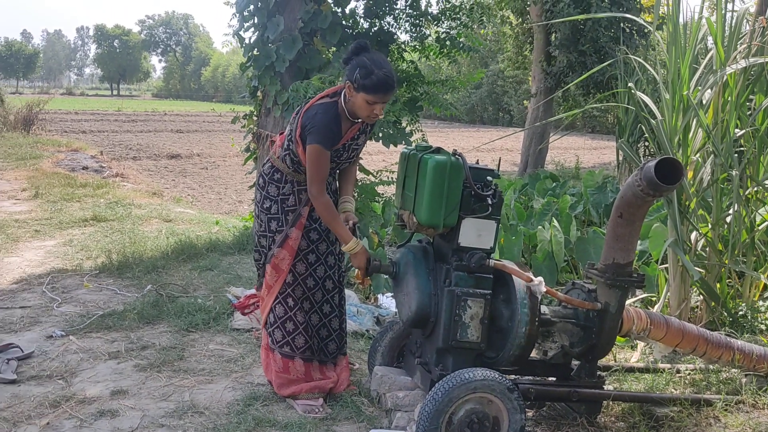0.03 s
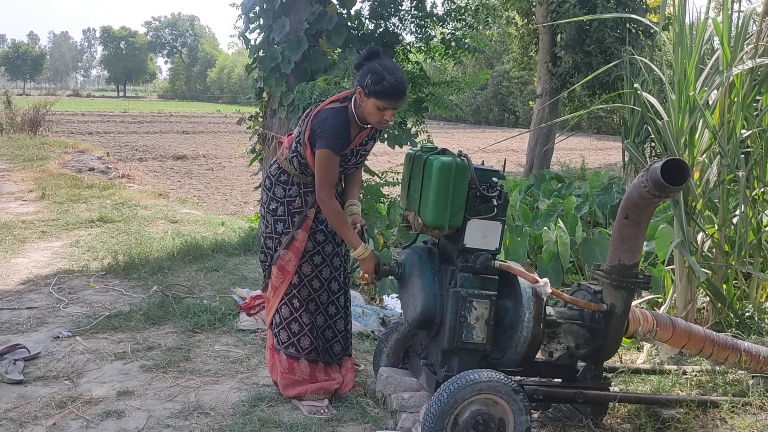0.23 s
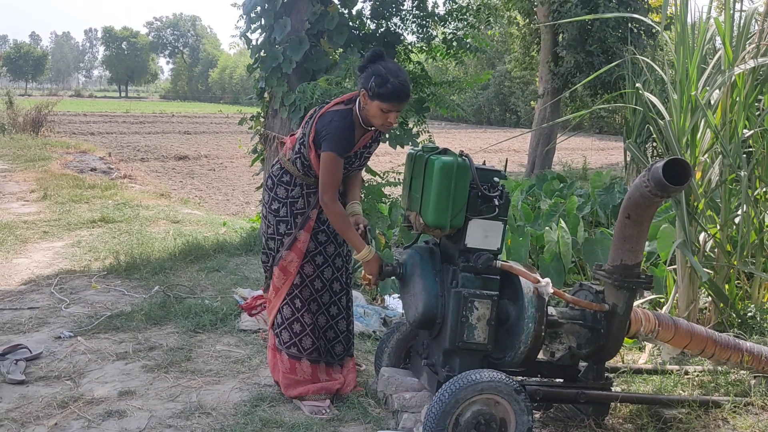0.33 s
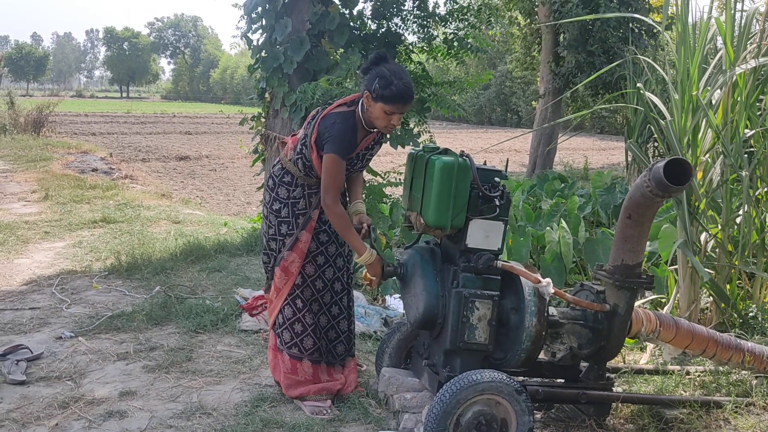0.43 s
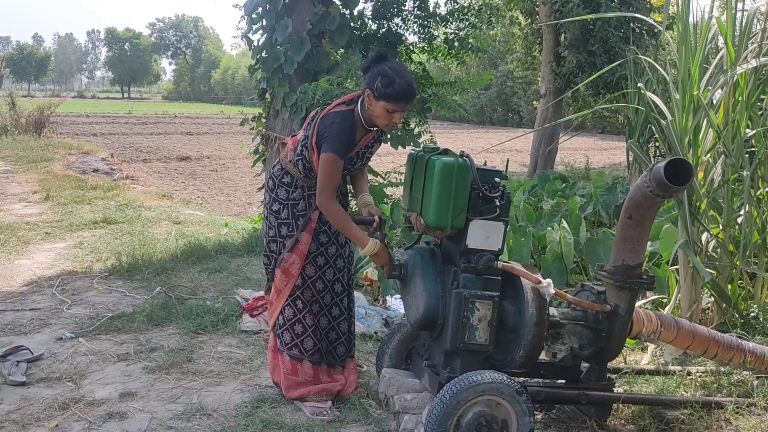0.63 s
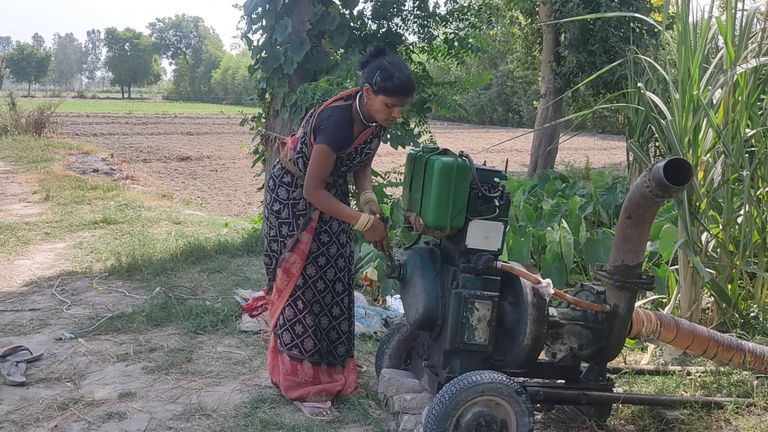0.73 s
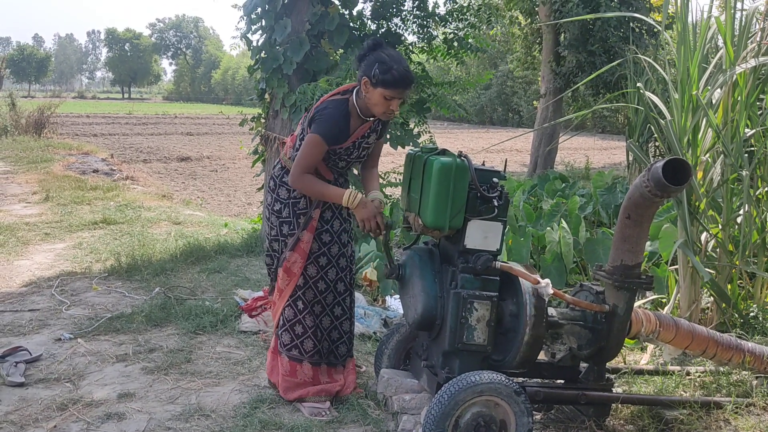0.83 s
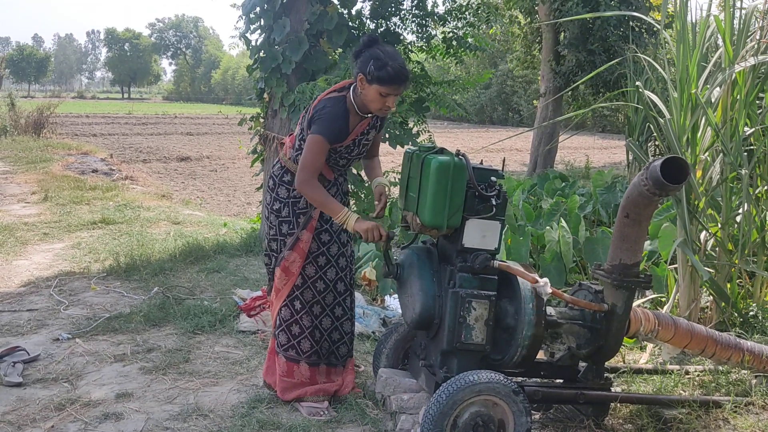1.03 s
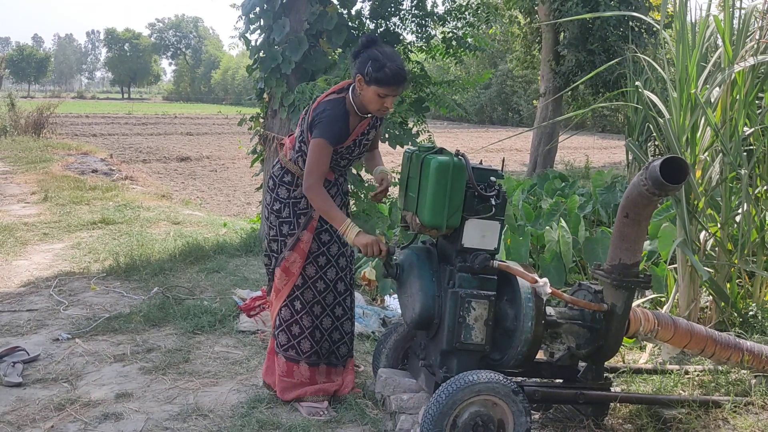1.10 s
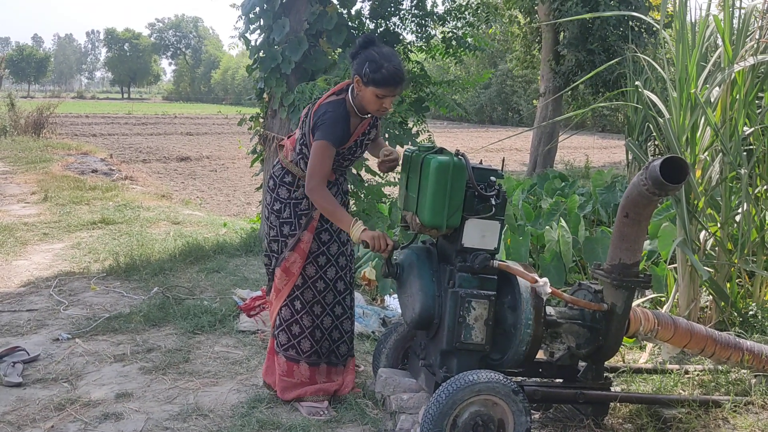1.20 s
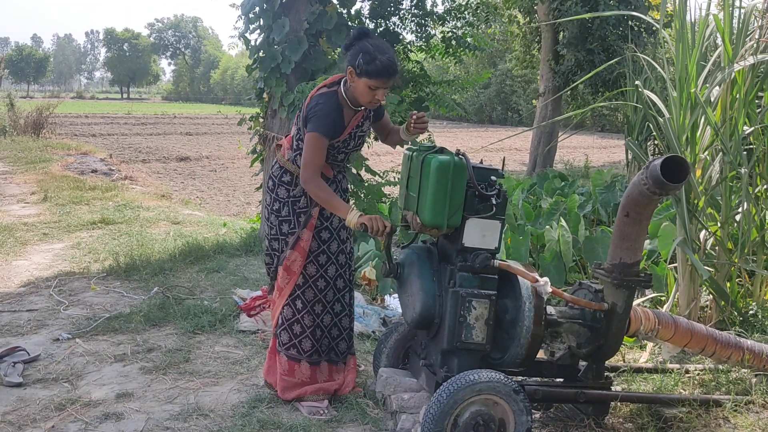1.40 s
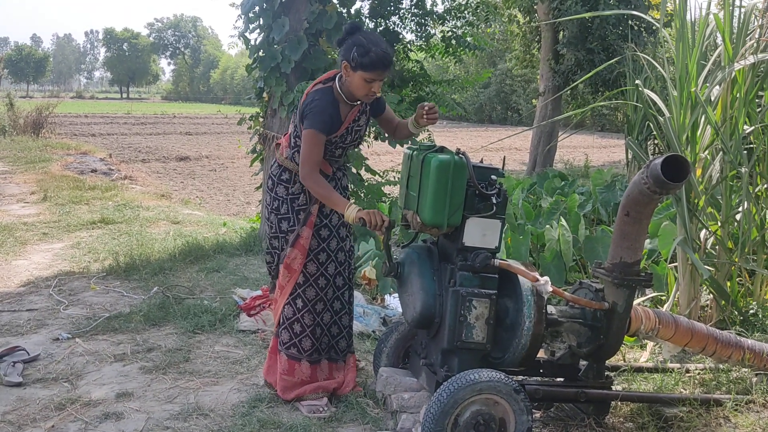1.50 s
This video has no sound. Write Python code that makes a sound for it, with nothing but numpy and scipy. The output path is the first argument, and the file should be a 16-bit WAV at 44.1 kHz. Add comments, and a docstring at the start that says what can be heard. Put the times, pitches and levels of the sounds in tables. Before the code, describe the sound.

Repeated high squeaks come from a diesel pump being turned by hand at a field's edge. Close iron clacks and hollow knocks build to one sharp clack, but it never starts. Another engine chugs far away.

```python
"""A dry bearing squeaks in arching strokes as a diesel pump engine is turned by hand and does not fire.
Friction drives the squeal and makes the shaft grind and hiss. Impacts excite damped resonances:
the loose iron crank clacks, and the engine knocks hollowly inside. Behind it a far single-cylinder
engine chugs as a steady pulse train over the low rumble and faint hiss of an open field."""
import sys
import numpy as np
from scipy import signal
from scipy.fft import rfft, irfft
from scipy.io import wavfile

SR = 44100
rng = np.random.default_rng(int(sys.argv[2]) if len(sys.argv) > 2 else 0)


def wrap_up_sound(samples):
    """Save the sound to the file named by the first command line argument, as 16-bit audio."""
    columns = np.atleast_2d(samples).T
    # keep every value between -1 and 1, then stretch to whole-number steps
    tamed = np.clip(columns, -1, 1)
    steps = np.round(tamed * 32767).astype(np.int16)
    wavfile.write(sys.argv[1], SR, steps)


N = 68355

# Bearing strokes: start_s, rise_s, fall_s, start_hz, crest_hz, end_hz,
# partial1_db, partial2_db, partial3_db, interharmonic_db (at 1.5 times the pitch), roughness_ratio
SQUEAKS = [(-.03, 0.035, 0.068, 2700, 2780, 2410, -90, -64, -61.5, -94, 0.01),
           (0.036, 0.011, 0.04, 2320, 2260, 1940, -82, -54.5, -80, -85, 0.0086),
           (0.109, 0.043, 0.1, 2290, 2735, 2525, -53, -59.5, -65, -58.5, 0.0013),
           (0.214, 0.011, .068, 2480, 2510, 2146, -63, -50, -53.5, -80, 0.012),
           (0.281, .008, .04, 2254, 2266, 1900, -70, -50.5, -58, -80, .02),
           (0.37, 0.042, 0.084, 2130, 2475, 2090, -55.5, -50.5, -54, -63, .012),
           (0.503, 0.013, 0.036, 2180, 2160, 2100, -78, -53.5, -65, -80, 0.011),
           (.558, 0.037, 0.14, 2125, 2488, 2232, -53, -48, -50.5, -80, 0.0033),
           (.776, 0.027, 0.087, 2150, 2399, 2210, -55, -43, -48, -72, 0.0077),
           (.957, 0.022, 0.14, 2206, 2308, 2030, -56.5, -46, -48.5, -74, 0.0048),
           (1.194, 0.014, 0.15, 2220, 2223, 2040, -55, -47.5, -48, -90, 0.0017),
           (1.343, 0.0039, 0.038, 2530, 2490, 1990, -62, -50.5, -52.5, -82, 0.026),
           (1.434, 0.024, 0.097, 2022, 2177, 1976, -56.5, -49, -50, -92, 0.0028)]
# Change of partials 1-3 over a stroke: change_db
PARTIAL_FADE_DB = [-6.5, -11.5, 0.5]
# Partials 4-7 relative to partial3_db: gain_db
OVERTONE_DB = [-27, -24, -33.5, -31]

# Crank impacts: start_s, level_db, contact_s, bass_db, treble_db, tail_db
CLACKS = [(0.224, -42.5, 0.0026, 15, -6, -6), (.238, -37.5, 0.0027, 4, -1.5, -4),
          (.258, -37.5, 0.0048, 4, 9, -6), (0.514, -49, 0.002, 7.5, -5, -7),
          (.574, -47.5, .004, 9, -19, -3.5), (.812, -33, 0.0073, 3.5, 8, -5.5),
          (0.881, -47.5, 0.0048, 2, 0.5, -2), (.938, -28, 0.0033, 10, 1.5, -16),
          (0.95, -33, .006, 1, -1, -6), (0.96, -36, 0.0042, -9, -5.5, -13),
          (1.064, -39, 0.0015, -8, 9, -7.5), (1.115, -42.5, 0.012, 1.5, 2.5, -2),
          (1.136, -34.5, 0.007, 7, 5, -10), (1.144, -28, 0.0036, 7.5, -4, -7.5),
          (1.1792, -16, 0.0038, -4, -3.5, -18), (1.196, -41.5, 0.017, -9, 14, -3),
          (1.252, -37.5, 0.0037, -1, -6.5, -12), (1.359, -47.5, 0.0039, -6, 0.5, -6.5),
          (1.541, -48, 0.0043, -8, 15, -14)]
# Resonances of the iron crank: centre_hz, bandwidth_hz, gain_db
CRANK_MODES = [(1090, 150, -2), (1707, 273, 1.5), (1953, 380, 0.5), (2750, 394, 4.5), (3423, 320, -1.5),
               (4300, 300, -1.5), (5434, 310, -1), (6200, 143, 2.5), (6920, 350, -7), (7540, 270, -4.5),
               (8300, 99, -19), (9870, 200, -15)]
# Stereo width of the clacks: frequency_hz, side_ratio
CLACK_SPREAD = [(900, 0.44), (2000, .45), (5000, 0.93)]
# Balance of the clacks: frequency_hz, left_minus_right_db
CLACK_PAN = [(900, 1.5), (2000, 2.5), (5000, -3)]

# Impacts inside the engine: start_s, level_db, contact_s, tail_db
KNOCKS = [(0.348, -35.5, 0.0077, -16), (.367, -38.5, 0.0043, -6), (0.574, -48, 0.0042, -17),
          (0.58, -45, 0.0074, -3), (0.878, -44.5, 0.0045, -11), (0.954, -44.5, 0.0029, -10.5),
          (1.119, -37, .007, -2), (1.144, -33.5, 0.013, -1), (1.184, -47, 0.0028, -18),
          (1.249, -41, 0.0036, -26)]
# Resonances of the crankcase: centre_hz, bandwidth_hz, gain_db
CASE_MODES = [(350, 120, -1.5), (475, 41, -5), (758, 102, 1), (864, 59, 5), (956, 30, 3), (1200, 200, -49)]
# Brief hollow tones after the knocks: centre_s, pitch_hz, level_db, half_width_s
HOOTS = [(.403, 868, -44, 0.012), (.672, 833, -48.5, 0.0071), (.71, 847, -51.5, 0.0089),
         (.907, 869, -48.5, 0.015)]

# Envelope of the shaft's grinding: time_s, level_db
GRIND_LEVEL = [(0, -56.5), (.17, -61.5), (.24, -48), (.32, -54), (.46, -59), (0.601, -50.5), (.75, -61.5),
               (.9, -54), (1.03, -70), (1.2, -52), (1.3, -81), (1.55, -57.5)]
# Resonances of the castings: centre_hz, bandwidth_hz, gain_db
CASTING_MODES = [(193, 26, 1.5), (380, 118, -1), (504, 57, -7.5), (794, 134, -4.5), (953, 32, -2),
                 (1480, 250, -13), (2160, 900, -26.5)]
# Envelope of the shaft's dry hiss: time_s, level_db
HISS_LEVEL = [(0, -60), (.09, -61.5), (.2, -59), (.27, -49.5), (.35, -55), (.55, -55), (.72, -53),
              (.9, -53), (1.1, -54), (1.22, -50.5), (1.289, -60), (1.37, -54), (1.479, -60), (1.55, -52)]
# Spectrum of that hiss: frequency_hz, gain_db
HISS_SPECTRUM = [(1000, -15.5), (2500, -4.5), (3200, -6.5), (4400, 2.5), (5300, -3.5), (6500, 1.5),
                 (7800, 0.5), (9000, -10), (10500, -22), (15000, -6)]

# Pulses of one far firing, the second being the boom: offset_s, pitch_hz, level_db, half_width_s
CHUG_PULSES = [(-.026, 307, -45.5, 0.0015), (-.0155, 88, -42.5, 0.0077), (0, 248, -35, 0.002),
               (.009, 174.4, -45.5, 0.0043)]
# Further gain on the boom: time_s, gain_db
BOOM_GAIN = [(0, -2), (.2, -5), (.31, 1.5), (.4, 7), (.5, 0), (.6, 5), (.8, 0), (1.05, 4.5), (1.3, -5),
             (1.55, 1)]

# Spectrum of the open air: frequency_hz, gain_db
AIR_SPECTRUM = [(25, -3.5), (45, -2.5), (70, 0.5), (110, -4.5), (160, -1.5), (230, -5.5), (370, -9),
                (480, -19.5), (640, -21.5), (930, -18.5), (1300, -24.5), (2000, -22), (3200, -28.5),
                (4400, -27.5), (7500, -26), (9000, -35.5), (11000, -63), (15500, -76)]
# Balance of the air: frequency_hz, left_minus_right_db
AIR_PAN = [(100, 4.5), (500, 4), (1500, 3), (5000, -3)]
# Stereo width of the air: frequency_hz, side_ratio
AIR_SPREAD = [(100, 0.3), (700, 0.9), (2000, 1), (6000, 1)]

BEARING_PAN_DB, CASE_PAN_DB, CASE_SPREAD = -2.5, 3.5, 0.32


def bearing(attack_s=0.025, release_s=0.014, wobble=0.00316, rasp=0.048, shimmer_db=2.5):
    """Dry friction sustains a harmonic squeal that sags as the shaft slows and breaks into a scrape."""
    t, out = times(), 0
    for start, rise, fall, start_hz, crest_hz, end_hz, db1, db2, db3, inter_db, rough in SQUEAKS:
        age = t - start
        progress = np.clip(age / (rise + fall), 0, 1)
        hz = crest_hz + (start_hz - crest_hz) * np.clip(1 - age / rise, 0, 1) ** 2
        hz += (end_hz - crest_hz) * np.clip((age - rise) / fall, 0, 1) ** 1.35
        roughness = rough + rasp * progress ** 2.5
        hz *= 1 + wobble * wander(66.7) + roughness * wander(560)
        lag_s = np.array([[0], [25e-6]]) * (1 + wander(12) / 4)  # the left channel trails the right
        phase = 2 * np.pi * (np.cumsum(hz) / SR + hz * lag_s)
        envelope = np.clip(age / attack_s, 0, 1) * np.clip((rise + fall - age) / release_s, 0, 1)
        levels = [db + fade * (progress - .5) for db, fade in zip((db1, db2, db3), PARTIAL_FADE_DB)]
        levels += [db3 + db for db in OVERTONE_DB]
        harmonics = sum(undb(db + shimmer_db * wander(90)) * np.sin(k * phase)
                        for k, db in enumerate(levels, 1))
        interharmonic = undb(inter_db) * np.sin(1.5 * phase)
        out += np.sqrt(2) * envelope * (harmonics + interharmonic)
    return out * pan(BEARING_PAN_DB)


def crank(ping_s=1.182, ping_hz=6225, ping_db=-27.5, ping_t60_s=0.11):
    """Impact excitation: the loose handle strikes its seat, and the hardest clack leaves it ringing."""
    f, clacks = freqs(), 0
    high_pass = (1j * f / 700 / (1 + 1j * f / 700)) ** 2
    ring = resonances(CRANK_MODES) * high_pass / (1 + (f / 9600) ** 14)
    for start, db, contact, bass_db, treble_db, tail_db in CLACKS:
        colour = undb(over_frequency([(1700, bass_db), (2900, 0), (3700, 0), (6000, treble_db)]))
        response = ring * colour * pan(over_frequency(CLACK_PAN))
        clacks += undb(db) * impact(start, contact, tail_db, over_frequency(CLACK_SPREAD), response,
                                    attack_s=0.00051, decay_s=0.0014, tail_s=0.024)
    age = np.maximum(times() - ping_s, 0)
    ping = undb(ping_db - 60 * age / ping_t60_s) * np.sin(2 * np.pi * ping_hz * age)
    treble_pan_db = CLACK_PAN[-1][1]
    return clacks + ping * pan(treble_pan_db)


def crankcase():
    """Damped resonance makes the knocks hollow; brief tones and one dull thud sound among them."""
    ring = resonances(CASE_MODES) / (1 + 1j * freqs() / 1800) ** 2
    knocks = sum(undb(db) * impact(start, contact, tail_db, CASE_SPREAD, ring,
                                   attack_s=0.001, decay_s=0.0035, tail_s=0.031)
                 for start, db, contact, tail_db in KNOCKS)
    hoots = sum(tone_burst(*row) for row in HOOTS) * undb(1.82 * wander(75))
    thud = tone_burst(centre_s=1.1515, pitch_hz=345, level_db=-24, half_width_s=0.0038)
    return (knocks + hoots + thud) * pan(CASE_PAN_DB)


def shaft():
    """Friction noise: the shaft grinds through the resonant castings and hisses where it rubs dry."""
    castings = resonances(CASTING_MODES) / (1 + (freqs() / 3000) ** 4)
    grind = unit_rms(filtered(stereo_noise(CASE_SPREAD), castings))
    hiss = unit_rms(filtered(stereo_noise(1.0), undb(over_frequency(HISS_SPECTRUM)) * hiss_rolloff()))
    hiss *= undb(over_time(HISS_LEVEL) + 1.55 * wander(74))
    grind *= undb(over_time(GRIND_LEVEL) + 2 * wander(75))
    return grind * pan(CASE_PAN_DB) + hiss * pan(BEARING_PAN_DB)


def far_engine(first_s=0.0446, period_s=0.09232, jitter_s=0.00073, scatter_db=0.23):
    """Periodic firing makes a pulse train of soft booms and pops; the boom swells and fades."""
    out, boom_gain = 0, undb(over_time(BOOM_GAIN))
    for firing in np.arange(first_s, N / SR, period_s):
        for k, (offset, hz, db, half_width) in enumerate(CHUG_PULSES):
            size, detune, late = rng.standard_normal(3)
            centre = firing + offset + jitter_s * late
            pulse = tone_burst(centre, hz * (1 + .04 * detune), db + scatter_db * size, half_width)
            out += pulse * (boom_gain if k == 1 else 1)
    return out * pan(6)


def open_air(level_db=-48, drift_db=2.25):
    """Broadband ambient noise: low rumble and faint leaf hiss drift together in level."""
    response = undb(over_frequency(AIR_SPECTRUM)) * hiss_rolloff() * pan(over_frequency(AIR_PAN))
    air = filtered(stereo_noise(over_frequency(AIR_SPREAD)), response)
    return unit_rms(air) * undb(level_db + drift_db * wander(4.3))


def impact(start_s, contact_s, tail_db, spread, response, attack_s, decay_s, tail_s):
    """Source and filter: the noise of a chattering contact and its scattered tail rings a body."""
    age = np.maximum(times() - start_s, 0)
    contact = np.exp(-np.maximum(age - contact_s, 0) / decay_s)
    tail = undb(tail_db) * np.exp(-age / tail_s)
    envelope = np.minimum(age / attack_s, 1) * (contact + tail)
    ringing = filtered(envelope * stereo_noise(spread), response)
    return unit_rms(ringing) * np.sqrt(np.mean(envelope ** 2))


def tone_burst(centre_s, pitch_hz, level_db, half_width_s, skew=0.34):
    """A skewed Gaussian envelope makes a tone swell faster than it dies."""
    age = times() - centre_s
    width = half_width_s * (1 + skew * np.sign(age))
    return undb(level_db) * np.exp(-.5 * (age / width) ** 2) * np.cos(2 * np.pi * pitch_hz * age)


def resonances(modes):
    """Modal superposition: a body's response is a sum of damped resonances."""
    f = freqs()
    return sum(undb(db) / (1 + 1j * hz / width * (f / hz - hz / f)) for hz, width, db in modes)


def hiss_rolloff(cutoff_hz=9300):
    """An eighth-order Butterworth magnitude response bounds the hiss band."""
    return 1 / np.sqrt(1 + (freqs() / cutoff_hz) ** 16)


def stereo_noise(spread):
    """Mid-side mixing: the side signal decorrelates two channels of white noise."""
    mid, side = rng.standard_normal((2, N))
    return mid + filtered(side, spread) * np.array([[1], [-1]])


def wander(cutoff_hz):
    """Low-passed noise gives a smooth random modulation of rms 1."""
    return unit_rms(filtered(rng.standard_normal(N), 1 / (1 + (freqs() / cutoff_hz) ** 4)))


def filtered(x, response):
    """Linear filtering multiplies the spectrum by a frequency response."""
    return irfft(rfft(x) * response, N)


def pan(db):
    """Left and right gains from a level difference; positive is left."""
    return undb(np.array([[.5], [-.5]]) * db)


def over_frequency(points):
    """Interpolation of (frequency_hz, value) points on a logarithmic axis."""
    hz, value = np.array(points, float).T
    return np.interp(np.log(freqs()), np.log(hz), value)


def over_time(points):
    """Linear interpolation of (time_s, value) points."""
    return np.interp(times(), *np.array(points).T)


def undb(db):
    """Amplitude ratio from decibels."""
    return 10 ** (np.asarray(db) / 20)


def unit_rms(x):
    """Normalisation to rms 1."""
    return x / np.sqrt(np.mean(x ** 2) + 1e-20)


def times():
    """Sample times in seconds."""
    return np.arange(N) / SR


def freqs():
    """Bin frequencies, at least 1 Hz."""
    return np.maximum(np.arange(N // 2 + 1) * SR / N, 1)


def scene():
    """Superposition: the pressures of all sources add."""
    return bearing() + crank() + crankcase() + shaft() + far_engine() + open_air()


def record(dry, cutoff_hz=15800):
    """An elliptic low-pass filter removes the highest treble."""
    return signal.sosfilt(signal.ellip(8, .2, 70, cutoff_hz, fs=SR, output="sos"), dry)


dry = scene()
out = record(dry)
wrap_up_sound(out)
```